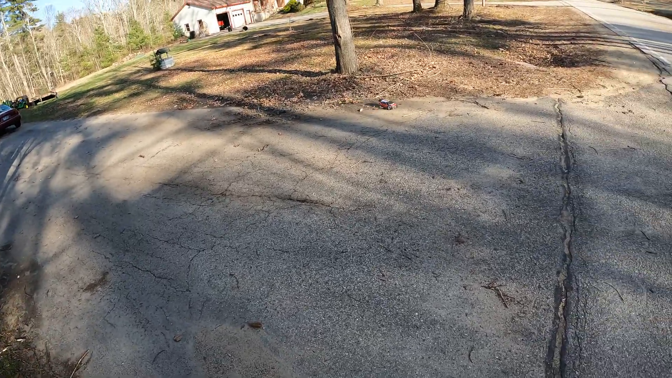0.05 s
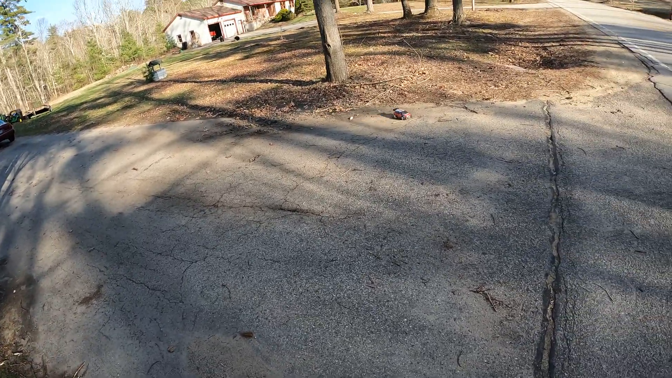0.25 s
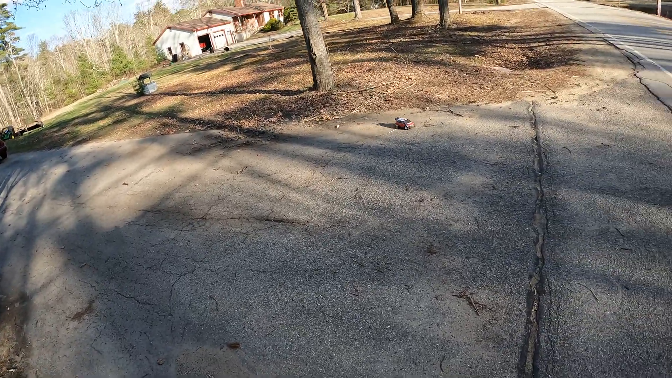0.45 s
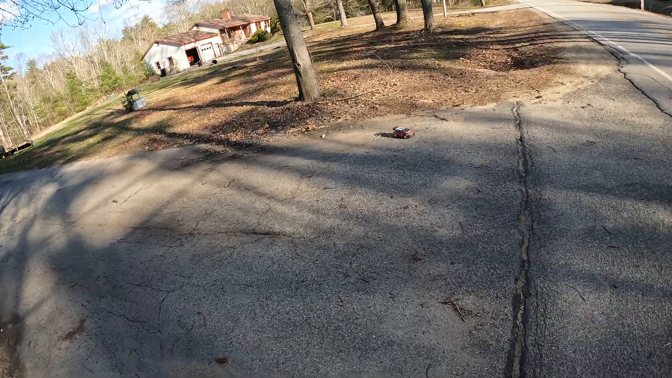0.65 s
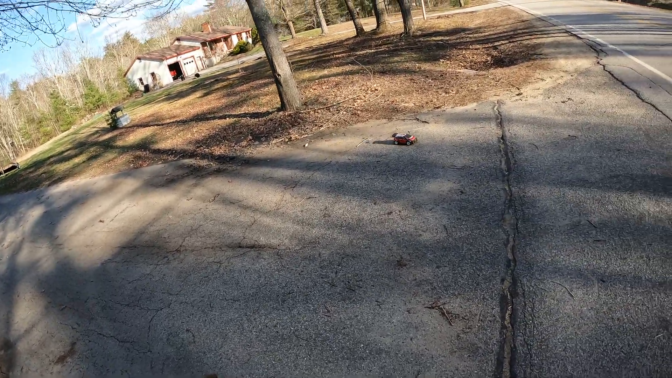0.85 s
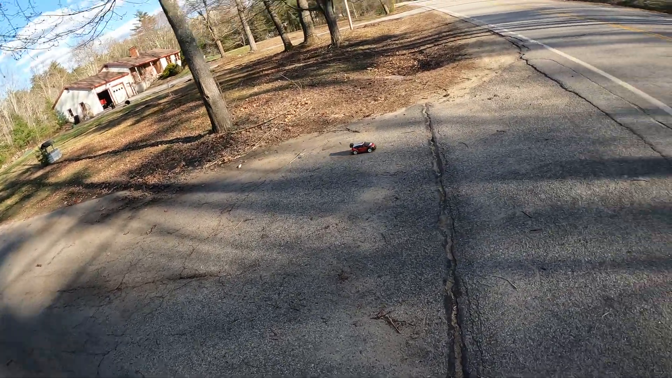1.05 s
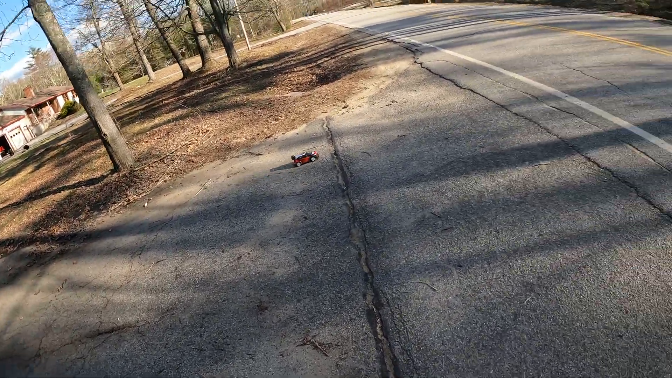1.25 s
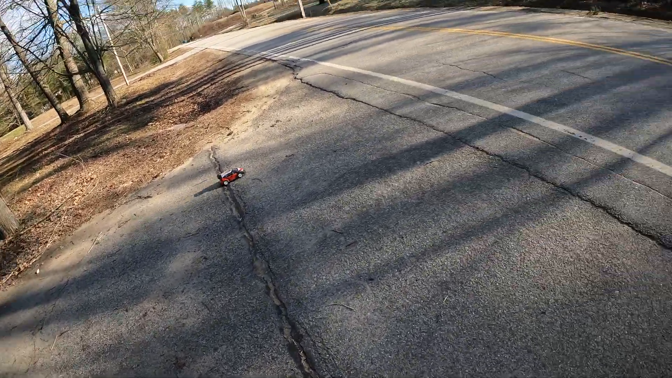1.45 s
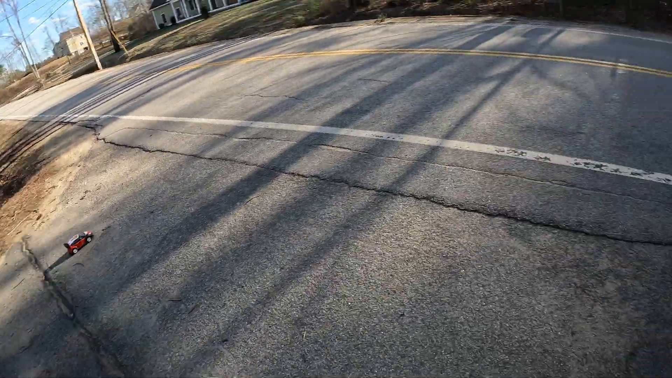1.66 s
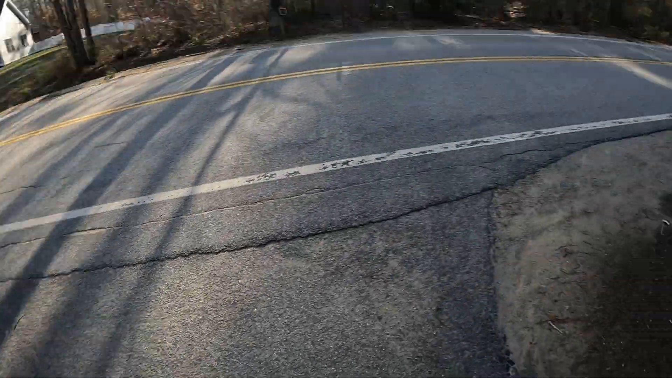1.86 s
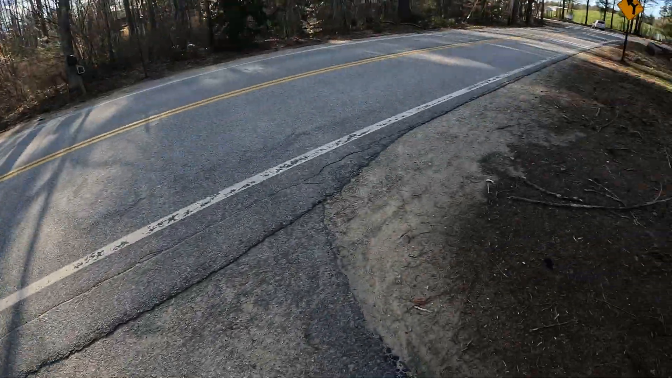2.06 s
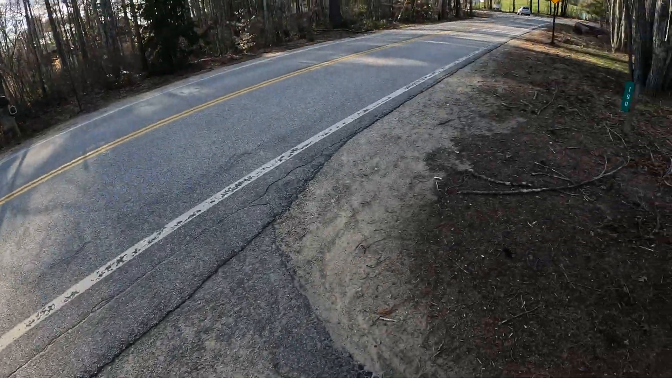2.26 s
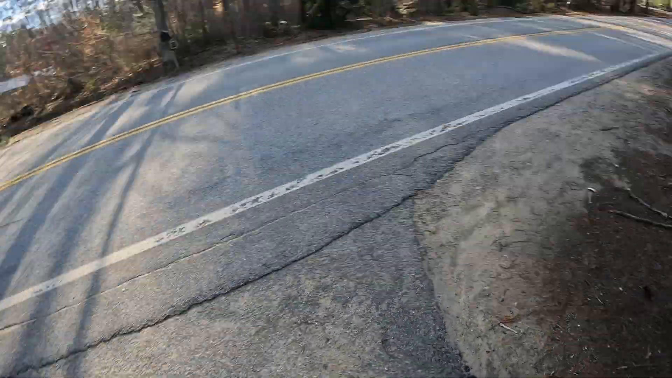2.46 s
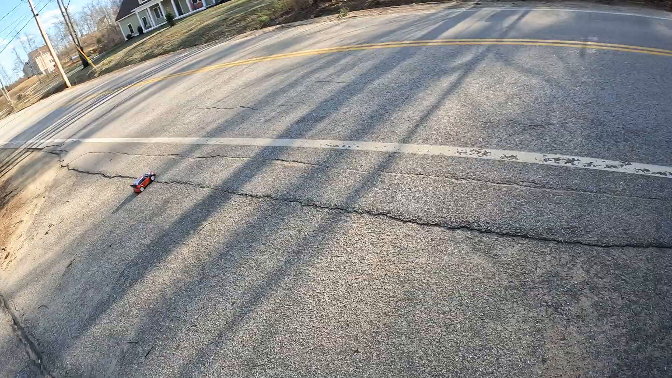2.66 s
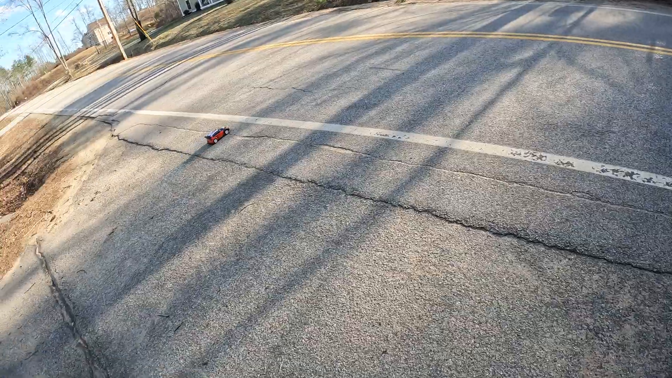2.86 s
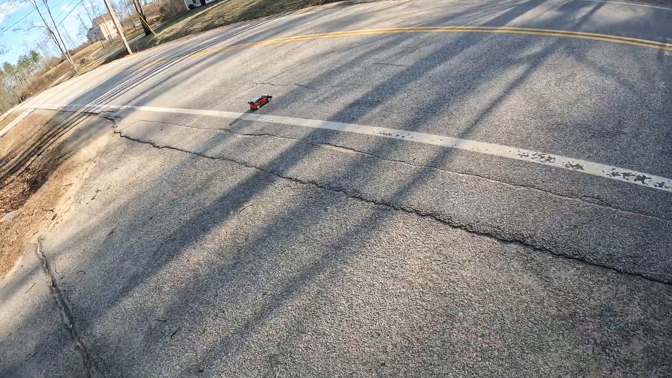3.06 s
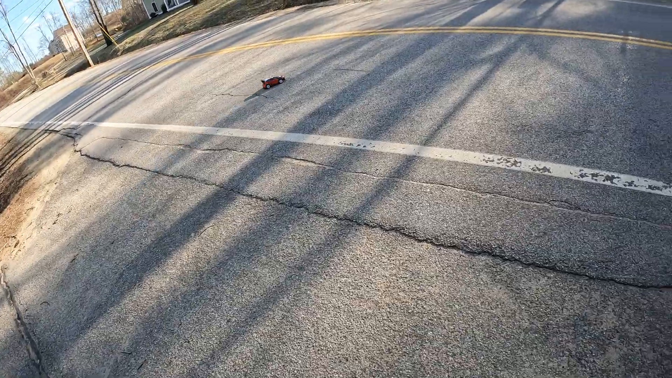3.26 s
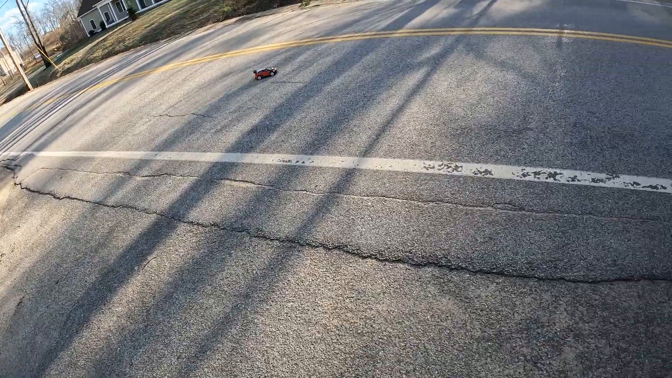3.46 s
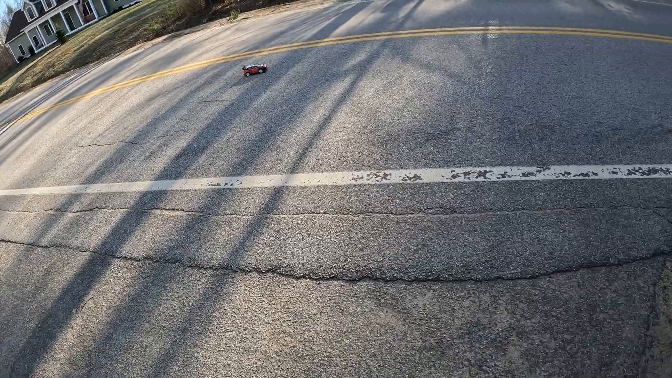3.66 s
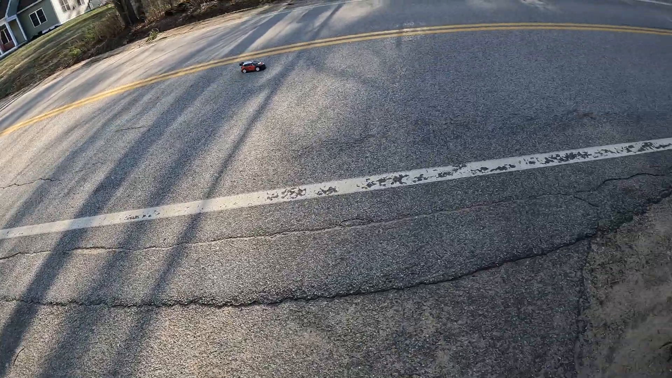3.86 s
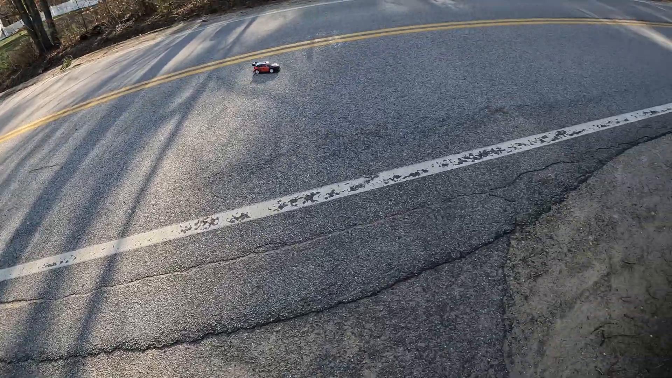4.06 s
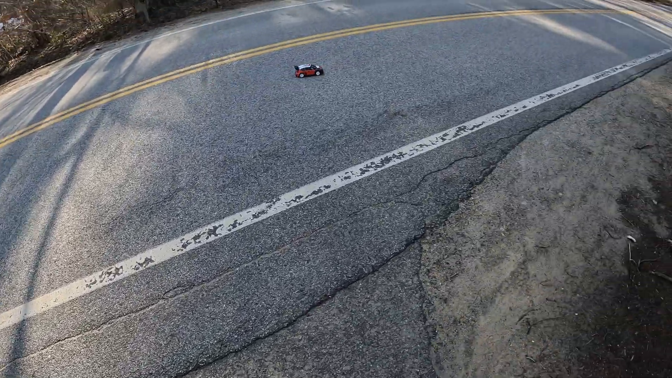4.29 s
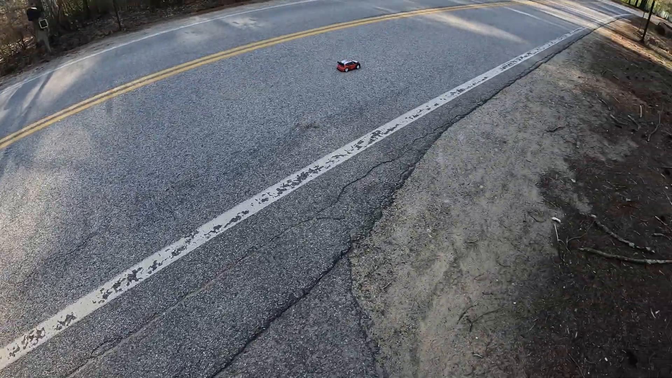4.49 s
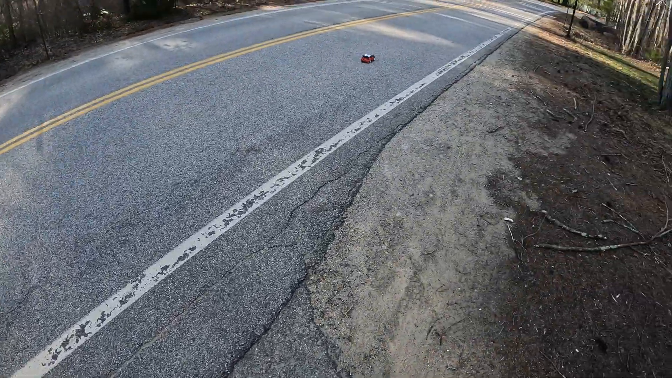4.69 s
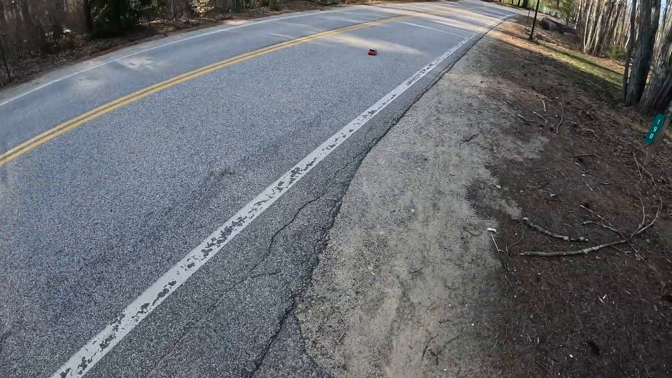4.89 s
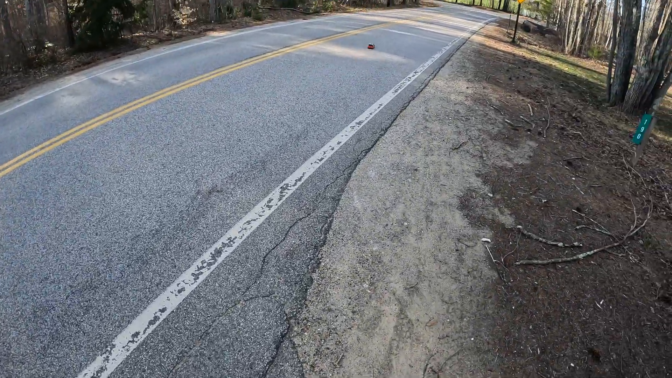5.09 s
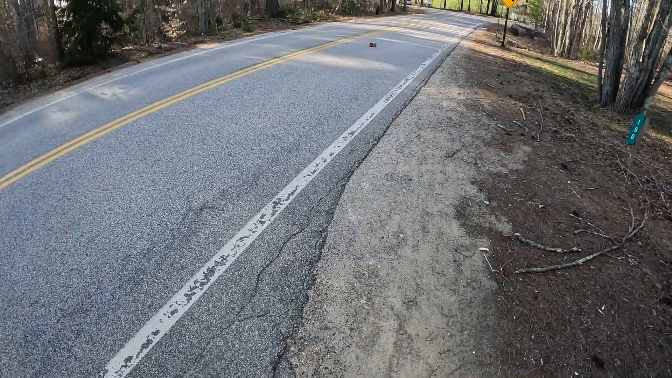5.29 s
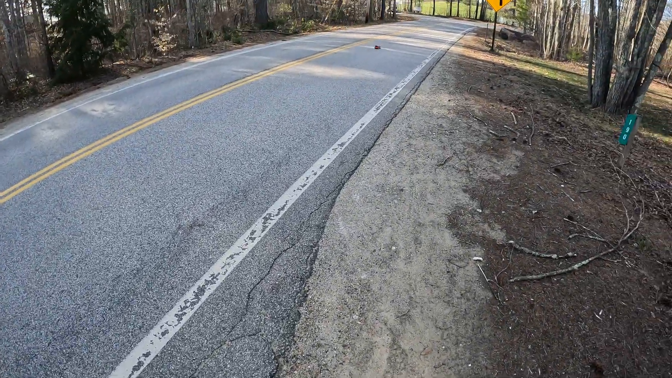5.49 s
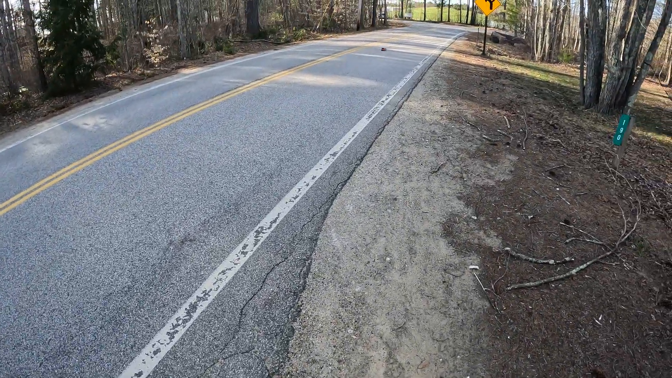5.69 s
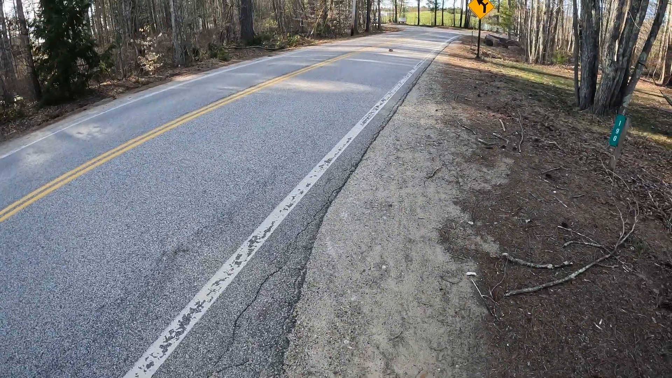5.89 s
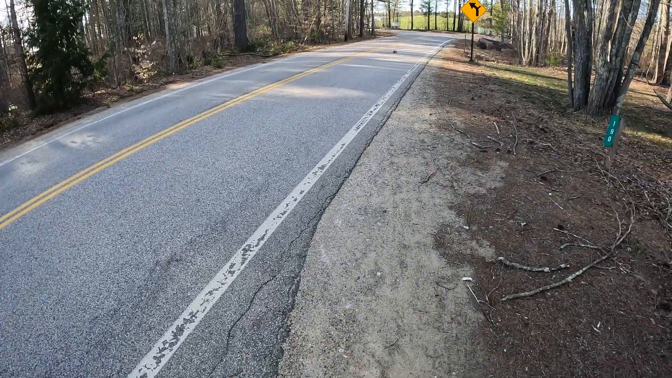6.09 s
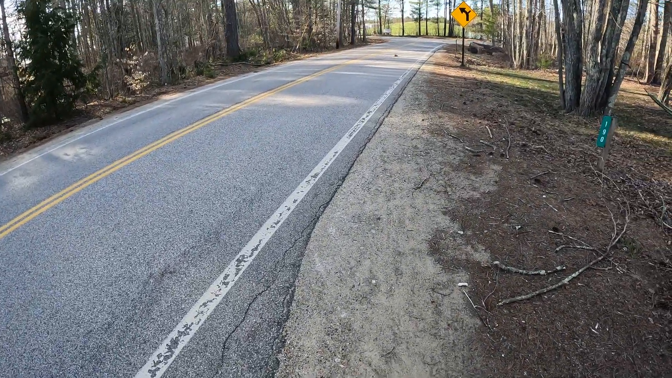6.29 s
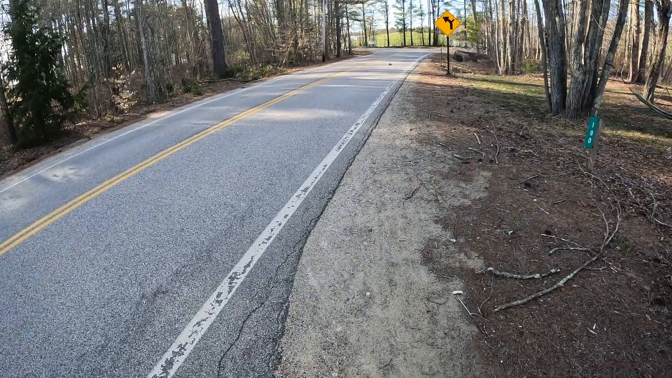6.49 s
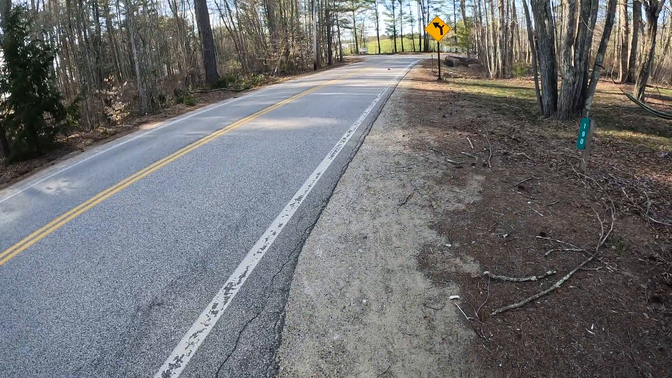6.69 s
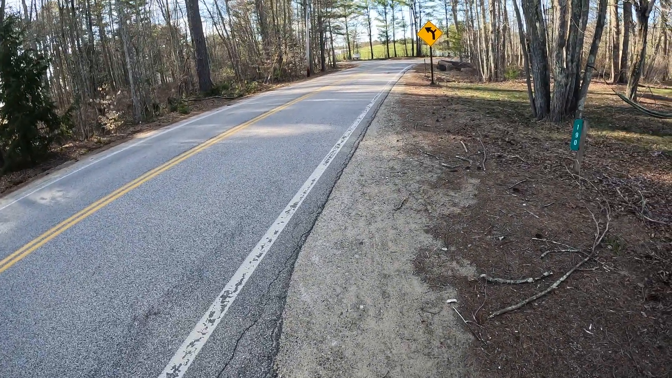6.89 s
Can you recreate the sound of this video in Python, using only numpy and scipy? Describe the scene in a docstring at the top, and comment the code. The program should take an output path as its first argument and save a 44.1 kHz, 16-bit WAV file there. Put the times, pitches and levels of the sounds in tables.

```python
"""Hiss of gears and tyres in leaves, over a distant machine's hum: a small electric model car turns on asphalt.
Crunches, plastic knocks and gusty pops on the right port follow; then gear teeth whine as it speeds away.
Shaped noise makes hiss, wind and crunches; sines make hum and whine; decaying rings make knocks and ticks."""
import sys
import numpy as np
from scipy import signal
from scipy.fft import rfft, irfft
from scipy.io import wavfile
from scipy.ndimage import uniform_filter1d

SR = 44100
rng = np.random.default_rng(int(sys.argv[2]) if len(sys.argv) > 2 else 0)


def persist_wave(psi):
    """Save psi, clipped to +-1, as 16-bit WAV."""
    counts = np.round(np.clip(psi, -1, 1) * 32767).astype(np.int16)
    wavfile.write(sys.argv[1], SR, np.atleast_2d(counts).T)


N = 306054  # length in samples

# distant machine: [f/Hz, level/dB before the slow fade]
HUM_TONES = [(59.2, -53.5), (118.4, -52.5), (156, -54), (177, -57)]

# steady breeze: [t/s, level/dB]
BREEZE_LEVEL = [(0, -41), (1.45, -43), (1.75, -34), (2.3, -35.5), (2.75, -31.5), (3.3, -31.5), (4.0, -30.5),
                (4.6, -41), (4.9, -46), (5.5, -44), (6.94, -47)]
# gusts: [t/s at full strength, hold/s, level/dB, brighter part/dB re low part]
GUST_EVENTS = [(0.229, 0.074, -36.5, -14), (1.807, 0.069, -22, -4.5), (1.884, 0.087, -24.5, 0),
               (1.972, 0.076, -19, -3.5), (2.373, 0.02, -31, -18), (2.52, 0.023, -30.5, -18),
               (2.819, 0.046, -22, -0.5), (2.928, 0.019, -37, -24), (3.023, 0.014, -26.5, -7),
               (3.347, 0.14, -31, -5), (3.511, 0.024, -17, -16.5), (3.7, 0.061, -28.5, -14),
               (4.062, 0.052, -18, -35), (4.183, 0.14, -22, 0.5), (4.42, 0.023, -29, -15),
               (4.65, .02, -38, -5), (5.336, 0.053, -42, 3.5), (5.986, .02, -31, -31),
               (6.08, 0.023, -33.5, -28), (6.253, 0.019, -37.5, -22), (6.78, 0.04, -38, -27)]
# eddies that pop on the port: [t/s, level/dB, f/Hz]
EDDY_POPS = [(1.86, -11.5, 300), (1.911, -16, 417), (1.951, -14, 310), (1.965, -24, 335),
             (1.993, -23.5, 440), (2.017, -14, 450), (2.038, -27, 370), (2.051, -20.5, 290),
             (2.826, -17.5, 350), (3.83, -20.5, 326), (4.195, -18, 297.7), (4.233, -32, 307),
             (4.263, -18, 336), (4.29, -18, 320), (4.323, -12, 363), (4.332, -17.5, 503), (5.345, -26, 286)]
GUST_RISE_S, GUST_FALL_DB_PER_S, BREEZE_BRIGHT_DB = 0.017, 350, -5
CALM_DB, PAN_PER_DB, PAN_MOST_DB = -43, .4, 7.2  # stronger wind favours the right port more
MONO_FROM_S = 4.6  # from here the wind is centred, practically mono
WIND_LEAD_SAMPLES = 16  # the left port feels an eddy first

TICKS_PER_S, TICK_DB, TICK_T60_S = 56, -61, 0.0036

# crunches of leaves and grit, and two short bright ticks after 4 s: [t/s, level/dB, t60/s, brightness/dB]
CRUNCH_EVENTS = [(.088, -34.5, 0.098, -5), (0.199, -33, 0.041, 3), (0.421, -30.5, 0.057, 0),
                 (.435, -31.5, 0.047, -9), (0.454, -39, 0.097, 3), (0.49, -37.5, 0.15, 1),
                 (.524, -34.5, 0.073, 4), (0.562, -34, 0.011, -9), (0.591, -39, 0.043, 3),
                 (0.61, -37, 0.071, -1), (0.625, -34, 0.017, 0), (1.306, -35, 0.039, -2),
                 (1.376, -32, 0.022, -6), (1.619, -30.5, 0.024, 4), (2.089, -46, 0.062, -21),
                 (2.13, -43, 0.09, -20), (2.845, -42, 0.096, 6), (3.075, -34, 0.075, 0),
                 (4.125, -25, 0.024, 9), (4.157, -27, 0.02, 7)]
# spectrum of these bursts: [f/Hz, relative level/dB]
GRIT_SPECTRUM = [(290, -26), (500, 3.5), (2160, -2), (2760, -0.5), (3150, -3.5), (5350, 0.5), (8240, -10.5),
                 (10400, -13.5), (15500, -29)]

# dull plastic knocks: [t/s, level/dB]
KNOCK_EVENTS = [(0.285, -25), (0.304, -28), (1.628, -20.5), (2.086, -20.5), (2.132, -20), (2.146, -16),
                (2.316, -26.5), (3.804, -17), (5.366, -26), (5.382, -23), (5.409, -29)]
# modes of the plastic shell: [nominal f/Hz, level/dB, t60/s]
SHELL_MODES = [(630, 6.5, 0.0085), (988, -2.5, 0.032), (1360, 0, 0.027), (1790, -7, 0.021)]

# the car's drive: [t/s, level/dB, treble level/dB, stage 0-4 as in STAGE_SPECTRA, held at 4 above that]
CAR_DRIVE = [(0, -35.5, -0.5, 0), (.35, -40.5, -1.5, 1.12), (.62, -42.5, -3.5, 1.05), (.7, -41.5, -5, 0.3),
             (1.05, -40, -3, 1), (1.35, -36, 0, 1), (1.6, -37.5, -4, 1.1), (1.88, -37, 8.5, 1.9),
             (2.0, -36.5, -8.5, 2.91), (2.55, -40, -1, 2), (2.9, -40, -1, 3), (3.13, -33, -2.5, 3.05),
             (3.61, -33, 0.5, 3), (3.8, -29, -2, 3), (4.37, -30, -1.5, 3), (4.77, -33.5, 1.5, 4),
             (5.3, -37.5, 2.5, 4.5), (6.0, -41.5, 2, 5), (6.94, -46, 4, 4)]
# one spectrum per stage (in leaves, coming, behind the listener, passing, leaving): [f/Hz, relative level/dB]
STAGE_SPECTRA = [
    [(180, -31), (300, 0.5), (581, -8.5), (1330, -2), (1970, -16.5), (2440, -10), (5390, -15),
     (10600, -28.5), (15500, -41)],
    [(180, -37), (300, 0), (543, -4), (835, -4.5), (1440, -1.5), (2040, -2), (2440, -20), (2830, -8),
     (3630, -17.5), (5850, -12.5), (7600, -10.5), (8420, -28.5), (10600, -21.5), (12100, -27), (15500, -50)],
    [(290, -19), (500, -8), (706, -13.5), (876, -5), (1410, -7.5), (2010, -19), (8850, -42.5), (12300, -59),
     (15500, -45)],
    [(290, -30), (500, -7), (696, -9.5), (900, -5.5), (1100, -9.5), (1450, 1), (2010, -16), (2430, -12),
     (3790, -15.5), (5590, -13), (6360, -16.5), (7600, -22.5), (9510, -24), (12000, -29), (15500, -43)],
    [(180, -78), (300, -11), (411, -6), (696, -8), (835, 1), (1390, -15), (2040, -10), (2690, -21),
     (3280, -14), (3810, -22.5), (5050, -13.5), (11900, -51.5), (15500, -43)],
]
# left over right, one value per stage: [level/dB]
STAGE_PAN = [1.1, 0.37, 3.5, 0.33, 0.072]
# stereo width, one value per stage: [width 0-1]
STAGE_SPREAD = [0.7, 0.56, 0.52, 0.42, 0.0046]
# shell resonances, stronger when loud: [f/Hz, width/Hz, coming level/dB, passing level/dB, leaving level/dB]
SHELL_RINGS = [(1514, 120, 12.5, 1.5, 17), (1960, 170, 2, 1.5, -17), (2613, 172, 4, 8, 5),
               (3150, 220, 18, 6.5, 0), (4650, 850, 22, 4, -6), (5220, 98, -19, 9.5, 8),
               (5900, 280, 21, 2, 7), (7500, 370, 8, 14, -9)]
QUIET_DB, LOUD_DB = -43, -27  # car levels at which those resonances are absent and full
# ring of the microphone port, one value per stage: [level/dB]
PORT_RING = [2, 7.7, 11, 10.8, 14.4]
PORT_HZ, PORT_WIDTH_HZ = 12040, 720
# phase by which the left port leads while the image is wide: [f/Hz, phase/rad]
PORT_PHASE = [(300, 0), (1460, -.3), (8000, -.35), (11300, 0), (12300, -.6), (13500, -3)]
# short whirs as the car comes: [t/s, length/s, f/Hz, level/dB over the hiss]
WHIR_EVENTS = [(.74, 0.2, 2800, 9.5), (1.04, 0.22, 2820, 13), (1.286, 0.28, 1850, 6.5)]
WHIR_WIDTH_HZ = 140

# the motor spins up, turns slowly, then takes full throttle: [t/s, tooth rate f/Hz, level/dB, overtone level/dB]
TOOTH_DRIVE = [(2.58, 836, -60, 0), (2.69, 1237, -39, 1), (2.8, 1632, -62, -6), (2.86, 1620, -75, 0),
               (2.98, 680, -48, 1), (3.05, 720, -39, -1), (3.17, 819, -42, 4), (3.4, 782, -44.5, 4),
               (3.6, 758.5, -42, 1), (3.77, 1003, -38, -9), (3.8, 1190, -33, -8), (3.9, 1240, -39.5, 10),
               (4.04, 1316, -31, 5), (4.18, 1393, -27, 0.5), (4.4, 1436, -25.5, -11),
               (4.62, 1537, -30.5, -2), (4.74, 1556, -43.5, 17.5), (4.97, 1567, -33, 6.5),
               (5.43, 1623, -36.5, -4), (5.67, 1631, -46, 9), (6.13, 1678, -47, 5),
               (6.94, 1694, -49.5, 8.5)]
# harmonics, fundamental first: [level/dB, gain/dB as the car shows its tail, gain/dB at low speed]
TOOTH_HARMONICS = [(0, -3, -0.5), (-5, -1.5, 1.5), (-26.5, 20.5, 26), (-24.5, 1, 28)]
# shaft and wheel side tones: [f in thirtieths of the tooth rate]
SIDE_TURNS = [15, 21, 24, 27, 31, 33, 36, 41, 54, 57, 109, 123, 132]
# their strengths: [level/dB]
SIDE_LEVELS = [-9.5, -2.5, 0, 0, 3, 2.5, 2, 2.5, 1, 2.5, 5.5, -5, -10]
# what each gains as the car shows its tail: [gain/dB]
SIDE_TAIL_GAINS = [1.5, 4.5, 4, 2, -1.5, -6, 1, -13, 2, 0, -0.5, 14, 22]
TURNS_PER_TOOTH = 30  # divides SIDE_TURNS into multiples of the tooth rate
SIDES_DB, SIDES_DB_PER_OCTAVE, SIDES_HZ = -11.5, 33, 1300  # side tones re hiss, growing up to SIDES_HZ
SIDE_BLUR_RAD, TOOTH_BLUR_RAD = 0.25, 0.25  # phase wander per multiple of the tooth rate, before the tail adds
# base of a short rising squeak as the wheels grip: [t/s, f/Hz, level/dB]
GRIP_SQUEAK = [(3.8, 1657, -59), (3.82, 1716, -34.5), (3.84, 1830, -41), (3.87, 1870, -81.5)]

EDGE_HZ = 15700  # band limit of the recorder


def amp(db):
    """Decibels to amplitude."""
    return 10 ** (np.asarray(db) / 20)


def evened(x):
    """Bring a signal to rms 1."""
    return x / np.sqrt(np.mean(x ** 2) + 1e-20)


def read(points, hz):
    """Read a spectrum along a logarithmic frequency axis."""
    f, value = np.transpose(points)
    return np.interp(np.log(hz + 1), np.log(f + 1), value)


def curves(rows, t):
    """Draw every column of a table as an automation curve over time."""
    s, *columns = np.transpose(rows)
    return [np.interp(t, s, column) for column in columns]


def add(mix, s, sound):
    """Lay a sound into the mix from time s."""
    part = mix[:, round(s * SR):][:, :sound.shape[-1]]
    part += sound[..., :part.shape[1]]


def sides(pan_db):
    """Left and right gains; positive pan favours the left."""
    return amp(np.array([pan_db / 2, -pan_db / 2]))


def band(x, lo_hz, hi_hz, order=2):
    """Butterworth band-pass."""
    return signal.sosfilt(signal.butter(order, [lo_hz, hi_hz], "bandpass", fs=SR, output="sos"), x)


def slow(per_s):
    """Smooth random drift of rms 1; a higher rate wanders faster."""
    size = max(round(SR / per_s), 1)
    smooth = uniform_filter1d(rng.standard_normal(N), size)
    return evened(uniform_filter1d(smooth, size))


def hum():
    """A distant machine: low sines that waver in pitch and level, under a slow fade."""
    t = np.arange(N) / SR
    fade_db = np.interp(t, [0, 1.7, 4.5, 6.94], [3.0, 3.6, -6, -4])
    out = np.zeros(N)
    for hz, db in HUM_TONES:
        level = np.sqrt(2) * amp(db + 1.4 * slow(23))
        turns = np.cumsum(hz + 1.634 * slow(4.46)) / SR
        out += level * np.sin(2 * np.pi * turns)
    return amp(fade_db) * out


def wind():
    """Lumpy low noise, nearly alike on both ports; gusts rise fast, hold and die away, and eddies pop."""
    t = np.arange(N) / SR
    breeze_db = curves(BREEZE_LEVEL, t)[0]
    low_gain = amp(breeze_db)
    bright_gain = low_gain * amp(BREEZE_BRIGHT_DB - 0.72 * np.maximum(breeze_db - CALM_DB, 0))
    for s, hold, db, bright_db in GUST_EVENTS:
        rise = np.clip((t - s) / GUST_RISE_S + 1, 0, 1) ** 2
        gust = rise * amp(db - GUST_FALL_DB_PER_S * np.clip(t - s - hold, 0, 1))
        low_gain = np.hypot(low_gain, gust)
        bright_gain = np.hypot(bright_gain, gust * amp(bright_db))

    strength_db = 20 * np.log10(uniform_filter1d(low_gain + 2 * bright_gain, size=4000))
    off_centre = np.clip((MONO_FROM_S - t) / .2, 0, 1)
    pan_db = -np.clip(PAN_PER_DB * (strength_db - CALM_DB), 0, PAN_MOST_DB) * off_centre
    main, other = rng.standard_normal((2, N))
    apart = np.clip(-.04 * pan_db, 0, 1) + 0.019
    both = np.array([main + apart * other, main])
    low = evened(band(band(both, 2, 43, order=1), 8.3, 118, order=2))
    bright = evened(band(band(both, 113, 160.5, order=1), 54.6, 337, order=3))
    low = low * low_gain * amp(2.1 * slow(29))
    bright = bright * bright_gain * amp(1.5 * slow(34))
    out = (low + bright) * sides(pan_db)

    for s, db, hz in EDDY_POPS:
        u = np.arange(-1.3, 2, hz / SR)  # in cycles: one sharp swing and a short wobble
        pop = np.sin(2 * np.pi * u) * np.exp(-(u / 0.52) ** 2)
        pop_gain = amp(db) * sides(1.3 * pan_db[round(s * SR)])
        add(out, s, pop_gain[:, None] * pop)
    left = np.where(t < MONO_FROM_S, np.roll(out[0], -WIND_LEAD_SAMPLES), out[0])
    return np.array([left, out[1]])


def ticks():
    """Tiny high ticks at random moments until MONO_FROM_S, mostly left: short decays at the port's pitch."""
    t = np.arange(400) / SR
    struck = (rng.random(N) < TICKS_PER_S / SR) * (np.arange(N) < MONO_FROM_S * SR)
    size = struck * amp(5.7 * np.minimum(rng.exponential(1, N), 4))
    envelope = np.minimum(t / 0.00035, 1) * amp(TICK_DB - 60 * t / TICK_T60_S)
    tick = envelope * np.sin(2 * np.pi * PORT_HZ * t)
    return sides(11.0)[:, None] * signal.oaconvolve(size, tick)[:N]


def crunches():
    """Leaves and grit, and two bright ticks: bursts of clumped snaps, each with its own share of top."""
    dull, top = np.zeros((2, N)), np.zeros((2, N))
    t = np.arange(4000) / SR
    chances = rng.standard_normal((len(CRUNCH_EVENTS), 3, len(t)))
    for (s, db, t60, bright_db), snaps in zip(CRUNCH_EVENTS, chances):
        grain = snaps[0] * amp(7.0 * snaps[1])  # random gain clumps the noise into snaps
        fall = amp(db - 60 * t / max(t60, .005)) * np.minimum(t / (0.13 * t60), 1)
        burst = np.array([grain, grain + 1.5 * snaps[2]]) * fall
        add(dull, s - .002, burst)
        add(top, s - .002, amp(bright_db) * burst)
    hz = np.fft.rfftfreq(N, 1 / SR)
    high = np.clip((hz - 7000) / 2000, 0, 1)  # crossover from dull to top
    spectrum = rfft(dull) * (1 - high) + rfft(top) * high
    return amp(3.0) * irfft(spectrum * amp(read(GRIT_SPECTRUM, hz)), N)


def knocks():
    """Short blows ring the decaying modes of a plastic shell, detuned afresh at each blow, alike on both sides."""
    out, t = np.zeros((2, N)), np.arange(3000) / SR
    attack = np.sin(np.pi / 2 * np.minimum(t / 0.0016, 1)) ** 2
    chances = rng.random((len(KNOCK_EVENTS), 2, len(SHELL_MODES)))
    for (s, db), (detunes, phases) in zip(KNOCK_EVENTS, chances):
        ring = np.zeros(len(t))
        for (hz, mode_db, t60), detune, phase in zip(SHELL_MODES, detunes, phases):
            pitch = hz * (0.909 + 0.25 * detune)
            ring += amp(mode_db - 60 * t / t60) * np.sin(2 * np.pi * (pitch * t + phase))
        add(out, s, amp(db - 3.5) * ring * attack)
    return out


def drive(t):
    """Level, treble and stage of the car, and the pan and width that follow from the stage."""
    level_db, treble_db, stage = curves(CAR_DRIVE, t)
    pan_db = np.interp(stage, range(5), STAGE_PAN)
    width = np.interp(stage, range(5), STAGE_SPREAD)
    return level_db, treble_db, stage, pan_db, width


def body_db(hz, stage):
    """The car's spectrum crossfades between stages as it turns and the ground reflection shifts."""
    held = np.clip(stage, 0, 4)
    return sum(np.clip(1 - abs(held - k), 0, 1) * read(spectrum, hz)
               for k, spectrum in enumerate(STAGE_SPECTRA))


def rings_db(hz, level_db, stage):
    """Resonances of the shell stand out more when the car is loud."""
    loud = np.clip((level_db - QUIET_DB) / (LOUD_DB - QUIET_DB), 0, 1)
    total_db = 0
    for f, wide, coming_db, passing_db, leaving_db in SHELL_RINGS:
        stage_db = np.interp(stage, range(5), [0, coming_db, 0, passing_db, leaving_db])
        total_db = total_db + stage_db * loud * np.exp(-((hz - f) / wide) ** 2)
    return total_db


def hiss():
    """Gears and tyres: random short-time spectra, patchy, flickering over the rough asphalt."""
    frames, hz = N // 128 + 5, np.fft.rfftfreq(512, 1 / SR)[:, None]
    t = np.arange(frames) * 128 / SR
    level_db, treble_db, stage, pan_db, width = drive(t)
    a, b, c, d, patches = rng.standard_normal((frames, 257, 5)).T
    patches = evened(uniform_filter1d(uniform_filter1d(patches, 20, 1), 5, 0))
    flicker = evened(uniform_filter1d(rng.standard_normal(frames), 4))
    high = np.clip(np.log2((hz + 1) / 1500) / 2, 0, 1.5)  # treble tilt

    shape = amp(body_db(hz, stage))
    shape /= np.sqrt((shape[7:26] ** 2).sum(0))  # unit power between 600 and 2200 Hz
    size = shape * amp(level_db + treble_db * high + 1.4 * patches + 0.83 * flicker * high)
    size *= amp(rings_db(hz, level_db, stage))
    for s, length, f, db in WHIR_EVENTS:
        swell = np.sin(np.pi * np.clip((t - s) / length, 0, 1))
        size *= amp(db * swell * np.exp(-((hz - f) / WHIR_WIDTH_HZ) ** 2))
    port_db = np.interp(stage, range(5), PORT_RING)
    size *= amp(port_db * np.exp(-((hz - PORT_HZ) / PORT_WIDTH_HZ) ** 2))

    apart = np.clip(width + 0.35 * (hz > 10500), 0, 1)  # the ports hear the top octave differently
    left = a + 1j * b
    right = np.sqrt(1 - apart ** 2) * left + apart * (c + 1j * d)
    right = right * np.exp(-1j * read(PORT_PHASE, hz) * np.clip(9 * width, 0, 1))
    spectra = np.array([left, right]) * size * sides(pan_db + 3.3 * (hz > 9000))
    return amp(-3.5) * signal.istft(spectra, nperseg=512, noverlap=384)[1][:, :N]


def squeak(t):
    """Gripping wheels squeak: the second and third multiples of a rising base pitch."""
    slip_hz, slip_db = curves(GRIP_SQUEAK, t)
    phase = 2 * np.pi * np.cumsum(slip_hz) / SR
    gate = (t > GRIP_SQUEAK[0][0]) * (t < GRIP_SQUEAK[-1][0])
    return amp(slip_db) * gate * (0.47 * np.sin(2 * phase) + np.sin(3 * phase))


def whine():
    """Tooth tone with its harmonics; uneven shafts add side tones; the body colours them all."""
    t, step = np.arange(N) / SR, slice(None, None, 64)  # levels are computed every 64 samples
    hz, drive_db, over_db = curves(TOOTH_DRIVE, t)
    level_db, _, stage, pan_db, width = drive(t)
    turns = np.cumsum(hz * (1 + 0.00495 * slow(44.5))) / SR
    throb = np.clip(0.033 + 0.51 * (stage - 3.2), .08, 1)
    beat = 1 + throb * np.cos(2 * np.pi * turns / 30)  # an uneven wheel throbs once a turn
    sides_db = level_db + SIDES_DB + SIDES_DB_PER_OCTAVE * np.minimum(np.log2(hz / SIDES_HZ), 0)
    tail = np.clip(stage - 3, 0, 1)
    crawl = np.clip(np.log2(SIDES_HZ / hz), 0, 1)  # grows at low speed

    def tone(multiple, db, waver_db, blur):
        """One wavering sine at a multiple of the tooth rate, coloured by the body."""
        f = multiple * hz[step]
        colour_db = body_db(f, stage[step]) + 0.7 * rings_db(f, level_db[step], stage[step])
        heard = amp(db[step] + colour_db + waver_db * slow(17)[step])
        phase = 2 * np.pi * (multiple * turns + rng.random())
        wander = blur * multiple * (1 + 1.1 * tail) * slow(70)
        return np.interp(t, t[step], heard) * np.sin(phase + wander)

    out = np.zeros(N)
    for k, (db, gain_db, slow_db) in enumerate(TOOTH_HARMONICS):
        tone_db = drive_db + (k > 0) * over_db + db + gain_db * tail + slow_db * crawl
        out += tone(k + 1, tone_db, waver_db=0.8 + 2.1 * k, blur=TOOTH_BLUR_RAD)
    out *= beat
    for k, db, gain_db in zip(SIDE_TURNS, SIDE_LEVELS, SIDE_TAIL_GAINS):
        tone_db = sides_db + db + gain_db * tail
        out += tone(k / TURNS_PER_TOOTH, tone_db, waver_db=1.8, blur=SIDE_BLUR_RAD)
    out *= np.clip((t - TOOTH_DRIVE[0][0]) / 0.026, 0, 1)  # fade in as the motor starts
    out += squeak(t)
    late = np.clip(9 * width, 0, 1)  # the left port leads while the car is near
    right = (1 - late) * out + late * np.roll(out, 1)
    return np.sqrt(2) * sides(pan_db) * np.array([out, right])


def scene():
    """All layers, from the far hum to the car itself."""
    return hum() + wind() + ticks() + crunches() + knocks() + hiss() + whine()


def record(dry):
    """The small microphone loses the very top; then the band limit of the recorder."""
    soft = signal.sosfilt(signal.butter(4, 14200, fs=SR, output="sos"), dry)
    edge = signal.firwin(511, EDGE_HZ, window=("kaiser", 9), fs=SR)
    return signal.oaconvolve(soft, edge[None], "same")


dry = scene()
out = record(dry)
persist_wave(out)
```